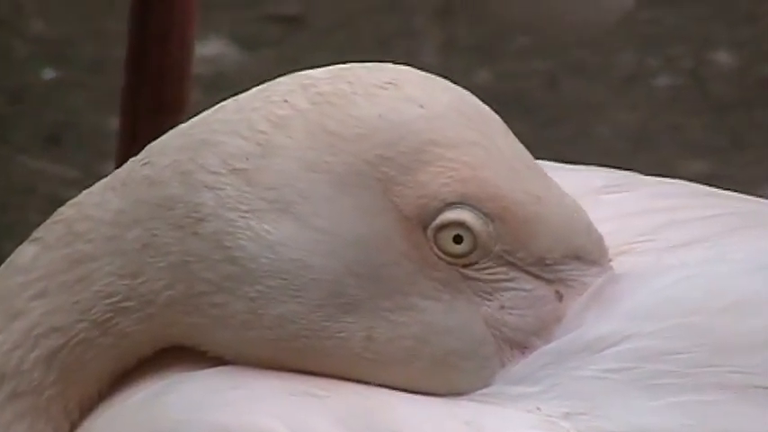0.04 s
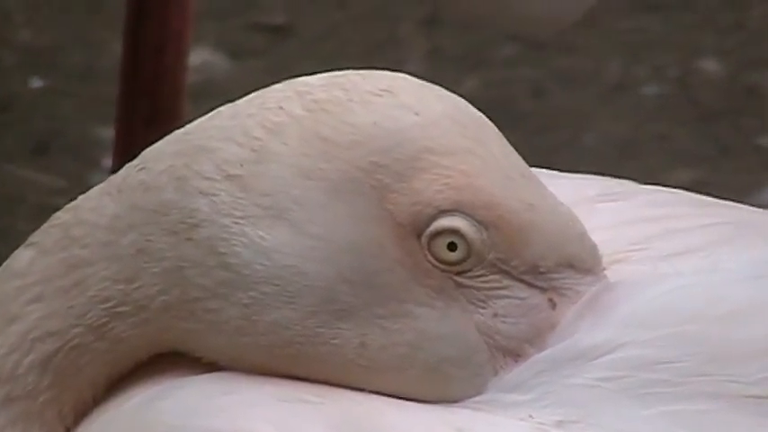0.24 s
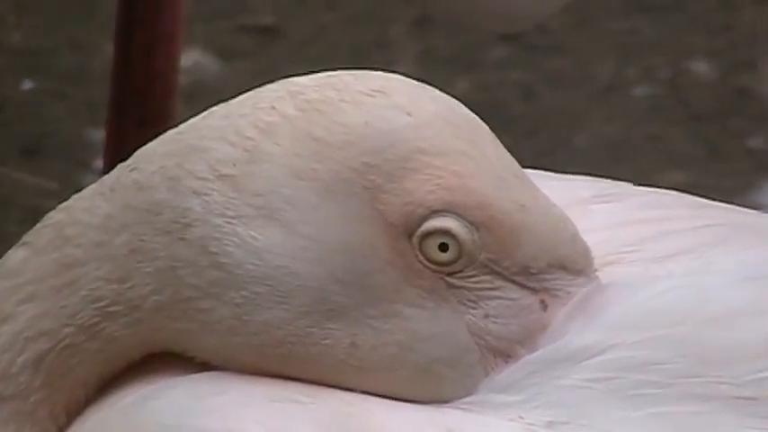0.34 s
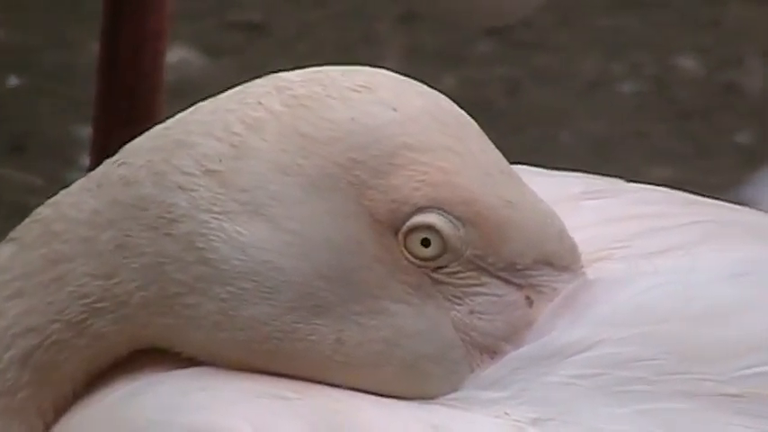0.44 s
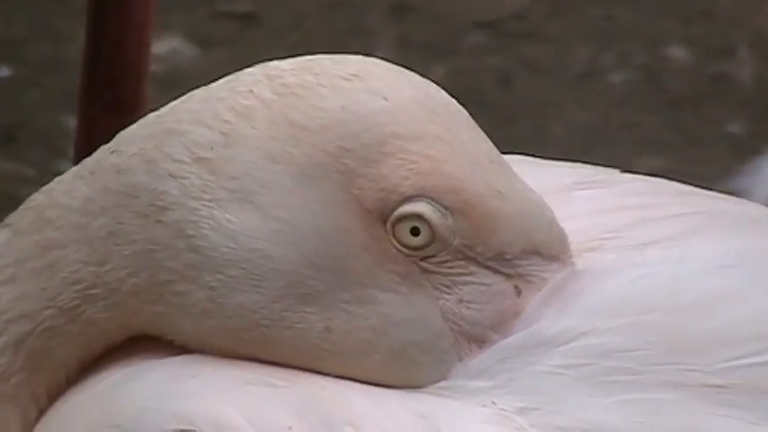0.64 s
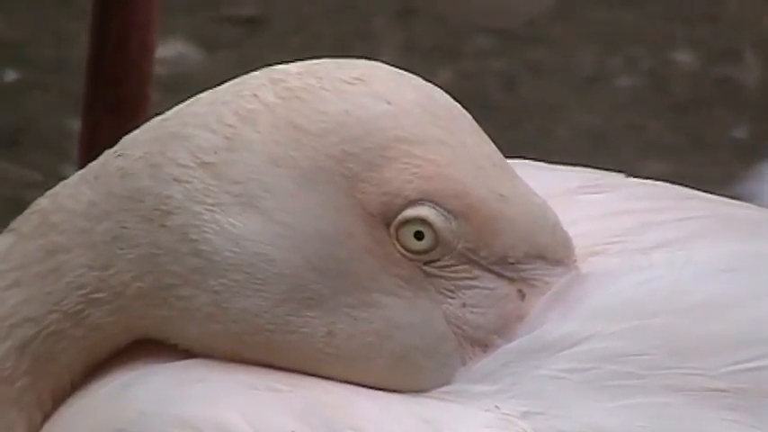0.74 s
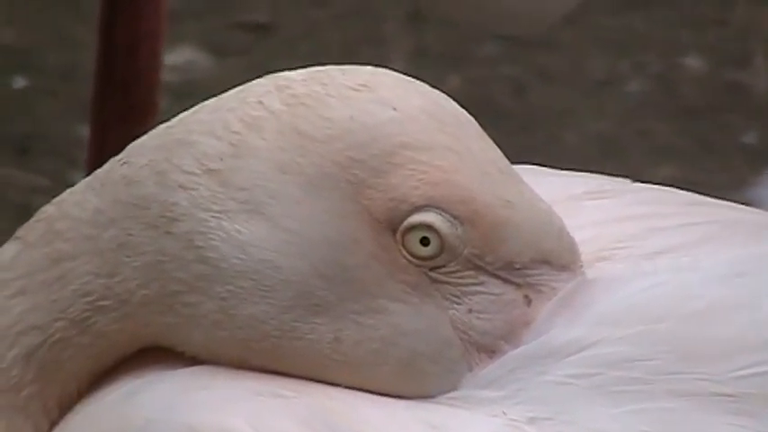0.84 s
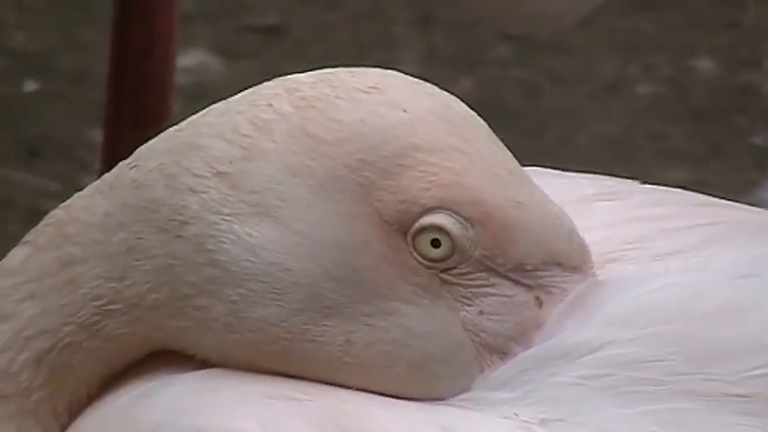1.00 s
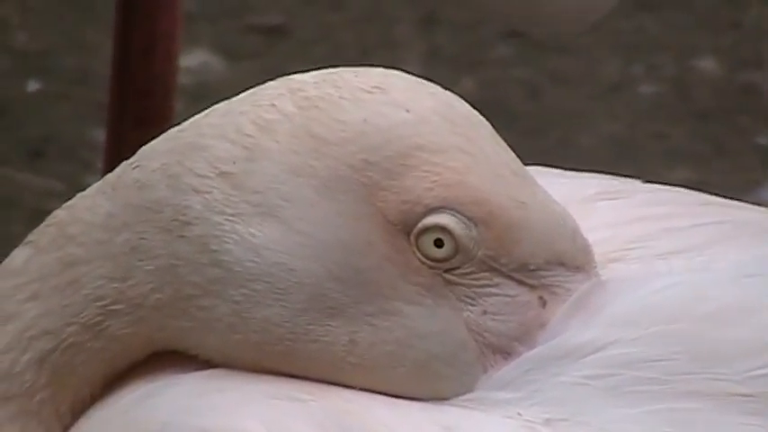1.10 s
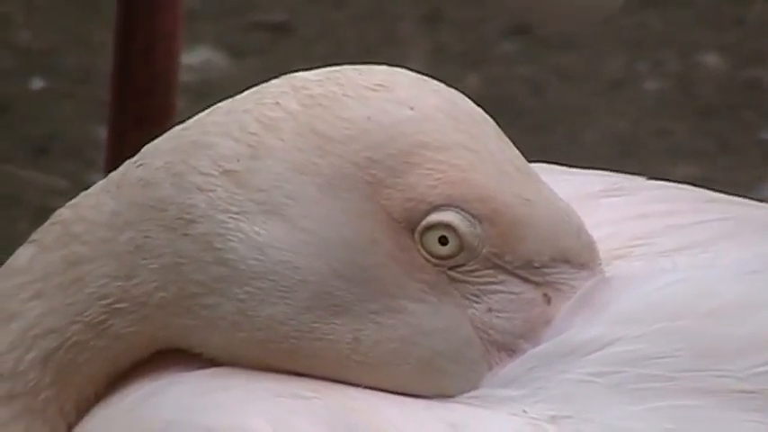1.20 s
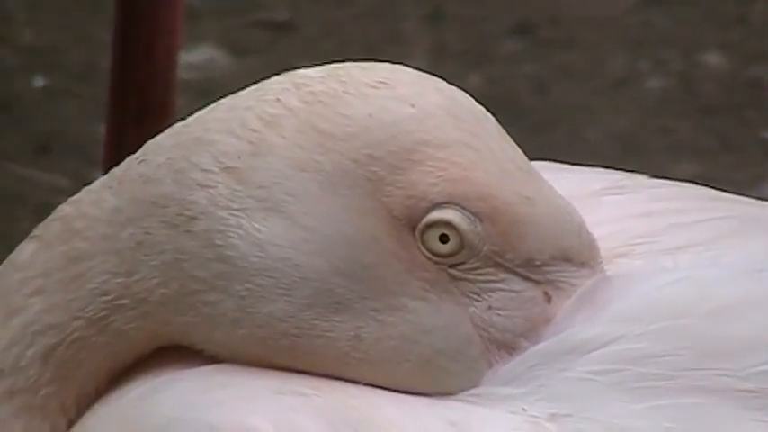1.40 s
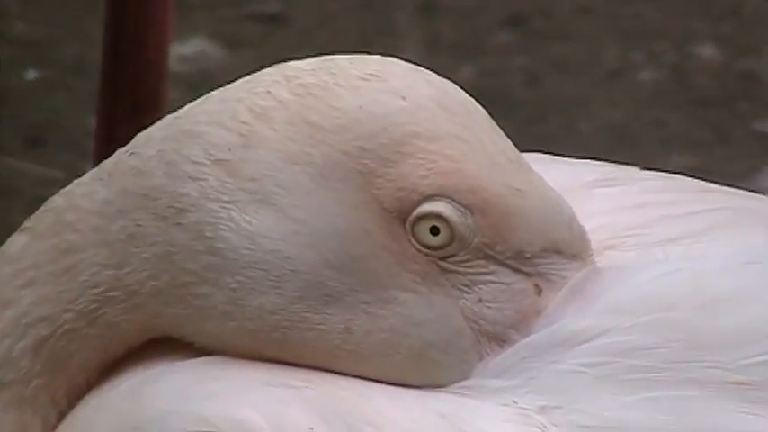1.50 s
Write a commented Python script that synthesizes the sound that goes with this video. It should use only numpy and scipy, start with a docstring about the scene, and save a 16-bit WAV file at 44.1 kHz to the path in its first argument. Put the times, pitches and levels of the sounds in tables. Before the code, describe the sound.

A flamingo gives three quick, shrill honks close to the microphone, each raspy at the edges and ringing briefly off hard enclosure walls. Farther off, other birds faintly whistle, honk and grunt over soft hiss and low rumble.

```python
"""A flamingo honks three times close to the microphone, in a hard-walled enclosure that rings after each call.
Its syrinx sends harmonics through the throat: each honk starts hoarse, clears to a shrill arched
tone (fourth harmonic strongest) and breaks into rasp as its pitch drops.
Farther off, other birds honk and whistle and one grunts, over a background of hiss and low rumble.
Gain control on the microphone signal holds the close honks down."""
import sys
import numpy as np
from scipy import signal
from scipy.fft import rfft, irfft
from scipy.io import wavfile
from scipy.ndimage import uniform_filter1d

SR = 44100
rng = np.random.default_rng(int(sys.argv[2]) if len(sys.argv) > 2 else 0)


def digitize_waveform(pressure):
    """Quantize a signal to 16-bit integers and store it at the path in sys.argv[1].

    Rows of a 2-D input are taken as channels; values are limited to [-1, 1].
    """
    field = np.atleast_2d(pressure).T
    bounded = np.clip(field, -1, 1)
    quanta = np.round(bounded * 32767).astype(np.int16)
    wavfile.write(sys.argv[1], SR, quanta)


N = 68355
T = np.arange(N) / SR
HZ = np.fft.rfftfreq(2 * N, 1 / SR)


def flamingo():
    """The main bird, close by: three honks and their echo off the walls."""
    # the voice, one table per honk: t/s, f/Hz, roughness/0-1, upper harmonics/dB, second harmonic/dB
    contours = [
        [(.172, 880, .92, -54, -67), (.198, 960, .75, -37, -51), (.212, 1018, .42, -28.5, -33),
         (.24, 1019, .3, -32.5, -47), (.268, 1009, .13, -28.5, -26), (.32, 1003, .1, -28, -35),
         (.365, 992, .13, -28.5, -30.5), (.392, 968, .2, -30.5, -36.5), (.422, 935, .88, -27.5, -41),
         (.456, 910, .8, -41, -56)],
        [(.572, 955, .64, -48, -57), (.598, 975, 0.26, -33, -30.5), (.635, 996, .16, -30.5, -38),
         (.672, 1006, 0.2, -27.5, -32), (.72, 1005, 0.12, -26.5, -37.5), (.762, 998, 0.18, -28.5, -33),
         (.782, 962, 0.25, -25.5, -39.5), (.797, 905, 0.74, -25, -44.5), (.815, 865, 0.84, -53, -51)],
        [(.918, 906, 0.96, -48, -74.5), (.942, 1029, 0.42, -34, -31.5), (.97, 1027, 0.22, -27, -24.5),
         (.995, 1040, 0.13, -27, -25.5), (1.025, 1047, 0.07, -32, -38.5), (1.068, 1029, 0.12, -30, -24),
         (1.112, 1008, 0.18, -31.5, -44), (1.14, 985, 0.19, -30, -47), (1.154, 920, 0.66, -29, -52),
         (1.17, 844, 0.73, -40.5, -54)],
    ]
    # the shrill band near 4 kHz, one table per honk: t/s, relative level/dB
    shrill_levels = [
        [(.175, -41.5), (.2, -25), (.214, -17), (.24, -9.5), (.258, -22.5), (.268, -9.5), (.31, -10),
         (.321, -36), (.335, -4), (.35, -45), (.36, -9), (.385, -26.5), (.405, -18), (.435, -19.5),
         (.46, -24.5)],
        [(.572, -26.5), (.594, -27), (.6, -13.5), (.637, -12), (.657, -19), (.671, -8.5), (.683, -27),
         (.697, -7.5), (.719, -12), (.743, -5), (.783, -18), (.8, -21), (.815, -13)],
        [(.918, -25), (.934, -34), (.943, -15), (.977, -20), (.987, -12), (1.005, -9), (1.019, -17),
         (1.04, -14), (1.053, -18), (1.065, -10), (1.105, -26.5), (1.127, -13), (1.155, -25), (1.17, -29)],
    ]
    voice = amp(0.67) * sum(honk(contour, level) for contour, level in zip(contours, shrill_levels))
    return voice + amp(-4.5) * enclosure(voice)


def honk(contour, shrill_level):
    """Fluttering harmonics of the syrinx; jitter, rasp and rattle take over where the voice is rough."""
    times, pitch_hz, roughness, upper_db, second_db = np.transpose(contour)
    rough = np.interp(T, times, roughness)
    fundamental = np.exp(1j * syrinx_phase(np.interp(T, times, pitch_hz), rough))
    from_middle_s = np.clip(T, times[0], times[-1]) - times.mean()
    upper = upper_harmonics(fundamental, rough, from_middle_s)
    upper = throat(envelope(np.c_[times, upper_db]) * upper)
    second = envelope(np.c_[times, second_db]) * fundamental ** 2 * flutter(depth=.2, rate_hz=80)
    shrill_gain = envelope(shrill_level)
    fourth = shrill_gain * np.sqrt(1 - rough ** 2) * fundamental ** 4
    fourth *= flutter(depth=.16 + .7 * rough, rate_hz=120)
    tone = np.sqrt(2) * (upper + second + fourth).real
    breath = shrill_gain * rough * rasp(rough)
    rattle = 1 + .33 * rough * wander(rate_hz=170)
    return (tone + breath) * rattle


def syrinx_phase(pitch_hz, rough):
    """Phase of a membrane whose pitch wavers, and jitters more the rougher the voice."""
    jitter = .04 * rough * wander(rate_hz=277.7)
    waver = .00406 * wander(rate_hz=75.4)
    return 2 * np.pi * np.cumsum(pitch_hz * (1 + jitter + waver)) / SR


def upper_harmonics(fundamental, rough, from_middle_s):
    """Buzzing harmonics 3 and 5-15: the 3rd and 5th grow through the call, roughness dulls 7 and up."""
    rise_db_per_s, dulling_db = 49, 12
    orders = np.array([3, *range(5, 16)])[:, None]
    gains = amp((orders < 6) * rise_db_per_s * from_middle_s - (orders > 6) * dulling_db * rough)
    swings = np.array([flutter(depth=.65, rate_hz=90) * flutter(depth=.13, rate_hz=300) for _ in orders])
    return (gains * swings * fundamental ** orders).sum(0).real


def throat(source):
    """The throat's resonances colour the harmonics that pass through it."""
    # throat response: f/Hz, gain/dB
    response = [(2250, -35), (3000, -1), (3500, 7), (4550, -6), (5050, -9), (5400, -17.5), (5750, -2.5),
                (6150, -2.5), (6500, -12.5), (7050, -12.5), (7500, -20.5), (8100, -28.5), (9000, -25.5),
                (10150, -27.5), (10900, -37.5), (15500, -43)]
    return shape(source, amp(read(response, HZ)))


def rasp(rough):
    """Air rushes through the throat and sets narrow resonances ringing, more so in a rough voice."""
    # rushing air: f/Hz, relative density/dB
    air_spectrum = [(500, -57.5), (1550, -30.5), (1950, -13.5), (2250, -25.5), (3300, -8), (4000, -0.5),
                    (4350, -6.5), (6050, -14.5), (6400, -32), (7600, -22), (10000, -45), (15500, -69.5)]
    # narrow resonances: f/Hz, relative level/dB
    resonances = [(3445, -4.5), (3671, 3.5), (3849, -1.5), (4600, -15), (5211, -5)]
    half_width_hz = 19
    air = noise(air_spectrum)
    peaks = sum(amp(db) / (1 + ((HZ - hz) / half_width_hz) ** 2) for hz, db in resonances)
    ringing = unit(shape(rng.standard_normal(N), peaks))
    return amp(-8.5) * air + amp(-5.5) * rough * ringing


def enclosure(voice):
    """Echo off the hard walls: sparse reflections of random sign, each band dying at its own speed."""
    # reverberation: f/Hz, t60/s, relative level/dB
    bands = [(308, 0.34, -3), (1430, .65, 2), (2016, 0.57, 1), (2960, 0.68, -1.5), (3900, 0.59, 1),
             (5600, 0.58, 6), (10000, 0.47, 6.5), (15000, 0.49, -4.5)]
    gap_s, slot = 0.0036, 16  # one reflection in each slot of samples
    starts = np.arange(0, SR - slot, slot)
    arrivals = starts + rng.integers(0, slot, (2, len(starts)))
    taps = np.zeros((2, SR))
    np.put_along_axis(taps, arrivals, rng.choice([-1., 1.], arrivals.shape), 1)
    reflections = pair(*taps, likeness=1) * (T[:SR] > gap_s)
    hz, t, spectra = signal.stft(reflections, SR, nperseg=256)
    band_hz, band_t60, band_db = np.transpose(bands)
    t60 = read(np.c_[band_hz, band_t60], hz)[:, None]
    echo_db = read(np.c_[band_hz, band_db], hz)[:, None]
    tail = signal.istft(spectra * amp(echo_db - 60 * t / t60), SR, nperseg=256)[1]
    tail *= np.sqrt(slot * np.log(10 ** 6) / SR / t60.max())  # divides out the longest decay's energy
    return signal.fftconvolve(voice[None], tail, axes=1)[:, :N]


def softer_calls():
    """The breathy bursts and the distant honks, heard with plenty of echo."""
    voices = breathy_bursts() + far_honks()
    return amp(3) * (voices + amp(-3) * enclosure(voices))


def breathy_bursts():
    """Hoarse swells of noise: the low rasp that opens the first close honk, later a neighbour's grunt."""
    # bursts: peak t/s, relative level/dB, rise/(dB/s), fall/(dB/s), extra bass/dB
    bursts = [(0.186, -32.5, 692.5, 216.5, 6.5), (1.231, -32.5, 176, 90, 5.5)]
    # breath: f/Hz, relative density/dB
    breath_spectrum = [(450, -30), (750, -11.5), (1300, -14.5), (1800, -13.5), (2300, -6), (3000, -4),
                       (4200, -0.5), (5200, -11), (6800, -26), (10000, -53), (15000, -78)]
    bass_hz = 1280
    voices = np.zeros(N)
    for peak_s, db, rise, fall, bass_db in bursts:
        breath = shape(noise(breath_spectrum), amp(bass_db / (1 + (HZ / bass_hz) ** 4)))
        voices += amp(db - np.maximum(rise * (peak_s - T), fall * (T - peak_s))) * breath
    return voices


def far_honks():
    """Duller honks from across the enclosure: five gliding harmonics under one broad spectral peak."""
    # honks: start t/s, length/s, first f/Hz, last f/Hz, relative level/dB, roughness/0-1, brightest f/Hz
    calls = [(.885, .1, 915, 960, -50.5, .9, 950), (.98, .2, 1020, 1090, -49.5, .7, 1100),
             (.95, .2, 770, 890, -50, .7, 1080), (1.135, .1, 950, 810, -45.5, .65, 900),
             (1.216, .075, 730, 706, -39.5, .75, 1480), (1.225, .06, 810, 790, -45.5, .7, 1600),
             (1.27, .08, 690, 650, -46, .9, 1300)]
    width_octaves, skirt_db = 0.45, -11
    orders = np.arange(1, 6)[:, None]
    voices = np.zeros(N)
    for start, length, first_hz, last_hz, db, rough, bright_hz in calls:
        phase = syrinx_phase(np.interp(T, [start, start + length], [first_hz, last_hz]), rough)
        gains = amp(skirt_db) + np.exp(-(np.log2(orders * first_hz / bright_hz) / width_octaves) ** 2)
        tone = (gains * np.exp(1j * orders * phase)).sum(0) * flutter(depth=.6, rate_hz=80)
        voices += amp(db) * swell(start, length) * unit(tone.real)
    return voices


def small_birds():
    """Thin whistles and a low coo from far off: faint, nearly pure notes with their echo."""
    # notes: start t/s, length/s, first f/Hz, last f/Hz, relative level/dB, roughness/0-1
    notes = [(-.03, 0.089, 4360, 4200, -40, 0.62), (-.03, 0.079, 3750, 3596, -37, 0.8),
             (0.052, 0.075, 3347, 3320, -39.5, 0.3), (0.059, 0.1, 3920, 3660, -38, 0.9),
             (0.572, 0.077, 432, 411, -46, 0.5)]
    voices = np.zeros(N)
    for start, length, first_hz, last_hz, db, rough in notes:
        phase = syrinx_phase(np.interp(T, [start, start + length], [first_hz, last_hz]), rough)
        voices += amp(db) * swell(start, length) * np.sin(phase)
    return voices + amp(-6) * enclosure(voices)


def background():
    """The ambience of the place: soft hiss and a rumble that swells and sinks, near mono in deep bass."""
    # ambient noise: f/Hz, relative density/dB
    spectrum = [(20, -30.5), (45, 2), (90, -1), (160, -2), (400, -4), (900, -5.5), (1500, -9), (2200, -7),
                (2800, -11), (4000, 1), (5200, -17), (7000, -26.5), (10000, -34), (15500, -48)]
    # stereo likeness: f/Hz, left-right correlation/0-1
    likeness = [(50, .93), (140, 0.65), (300, 0.61), (700, 0.76), (1500, 0.9), (4000, 0.94), (7000, .4)]
    # swell of the rumble: t/s, gain/dB
    rumble_level = [(0, 4.5), (.3, 0), (.65, 0.5), (.9, 1), (1.09, -5.5), (1.3, -3), (1.5, 1.5)]
    rumble_top_hz = 400
    white = pair(*rfft(rng.standard_normal((2, 2 * N))), read(likeness, HZ))
    air = unit(irfft(white * amp(read(spectrum, HZ)))[:, :N])
    rumble = shape(air, 1 / (1 + (HZ / rumble_top_hz) ** 4))
    hiss = air - rumble
    return amp(-43.5) * (hiss + rumble * amp(np.interp(T, *np.transpose(rumble_level))))


def amp(db):
    """Decibels to gain."""
    return 10 ** (np.asarray(db) / 20)


def unit(x):
    """Scales to rms 1."""
    return x / np.sqrt(np.mean(x ** 2) + 1e-20)


def read(points, hz):
    """Reads a spectrum on a log-frequency axis."""
    f, value = np.transpose(points)
    return np.interp(np.log(hz + 1), np.log(f + 1), value)


def shape(x, gain):
    """Filters by a gain for each frequency."""
    return irfft(rfft(x, 2 * N) * gain)[..., :N]


def noise(spectrum):
    """Noise of rms 1 with the given spectrum."""
    return unit(shape(rng.standard_normal(N), amp(read(spectrum, HZ))))


def pair(a, b, likeness):
    """Left and right from two unrelated signals; likeness 1 is mono."""
    mid, side = np.sqrt((1 + likeness) / 2) * a, np.sqrt((1 - likeness) / 2) * b
    return np.array([mid + side, mid - side])


def wander(rate_hz, size=8192):
    """Smooth random motion of rms 1, up to about the given rate."""
    hz = np.fft.rfftfreq(size, T[-1] / size)
    slow = irfft(rfft(rng.standard_normal(size)) * np.exp(-(hz / rate_hz) ** 2))
    return unit(np.interp(T, np.linspace(0, T[-1], size), slow))


def flutter(depth, rate_hz):
    """Quick random swings of a tone's strength and phase, mean power 1."""
    return (1 + depth * (wander(rate_hz) + 1j * wander(rate_hz))) / np.sqrt(1 + 2 * depth ** 2)


def envelope(points, edge_s=0.0037):
    """A gain curve with soft ends, through points of t/s, level/dB."""
    times, db = np.transpose(points)
    fade = np.clip(np.minimum(T - times[0], times[-1] - T) / edge_s + 1, 0, 1)
    return amp(np.interp(T, times, db)) * fade


def swell(start, length, rise_s=0.0034, fall_s=0.0054):
    """Attack, hold and release of a short call."""
    return np.clip((T - start) / rise_s, 0, 1) * np.clip((start + length - T) / fall_s, 0, 1)


def scene():
    """The birds reach the two microphone ports with different level and phase, a little to the right."""
    # balance between the ports: f/Hz, left minus right/dB
    balance = [(1000, 0.5), (2000, 1), (3000, -1), (4050, -3.5), (5200, -7.5), (7000, 8.5), (9100, 7.5),
               (14000, -2)]
    # phase between the ports: f/Hz, lead of the left/rad
    lead = [(1500, 0), (2500, .1), (4100, .47), (5000, .65), (6600, 2.2), (7200, 2), (8000, .4),
            (11000, .1)]
    side = np.array([[.5], [-.5]])
    ports = amp(side * read(balance, HZ)) * np.exp(1j * side * read(lead, HZ))
    return shape(flamingo() + softer_calls() + small_birds(), ports) + background()


def record(dry):
    """Gain control holds the honks down and ducks the background; a low-pass trims the top treble."""
    threshold_db, ratio, recover_db_per_s, cutoff_hz = -10.5, 5.2, 28, 15800
    power_db = 10 * np.log10(abs(uniform_filter1d((dry ** 2).mean(0), size=130)) + 1e-12)
    recovery_db = T * recover_db_per_s
    held_db = np.maximum.accumulate(power_db + recovery_db) - recovery_db  # jumps up, sinks slowly
    over_db = uniform_filter1d(np.maximum(held_db - threshold_db, 0), size=100)
    ducked = dry * amp(-(1 - 1 / ratio) * over_db)
    low_pass = signal.firwin(511, cutoff_hz, window=("kaiser", 9), fs=SR)
    return signal.oaconvolve(ducked, low_pass[None], "same")


dry = scene()
out = record(dry)
digitize_waveform(out)
```